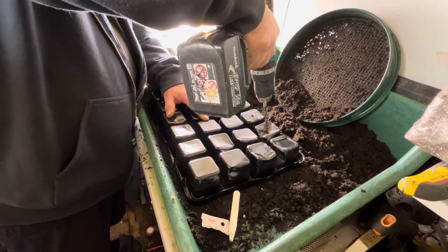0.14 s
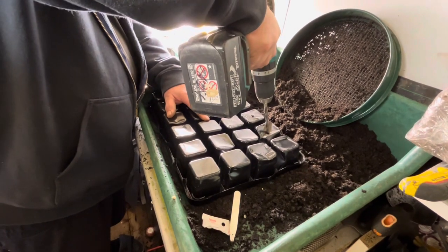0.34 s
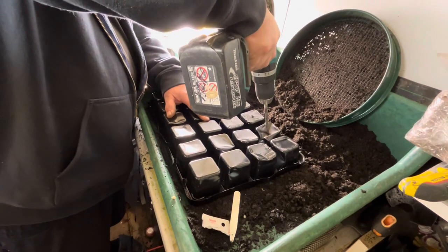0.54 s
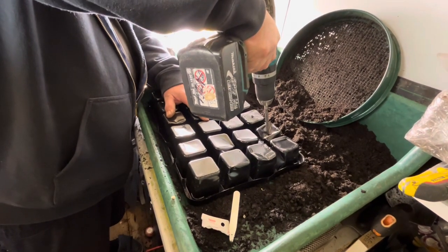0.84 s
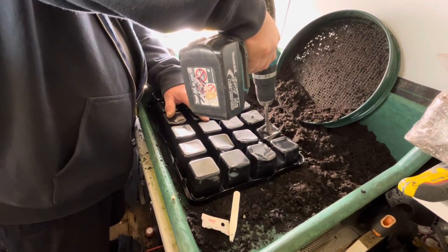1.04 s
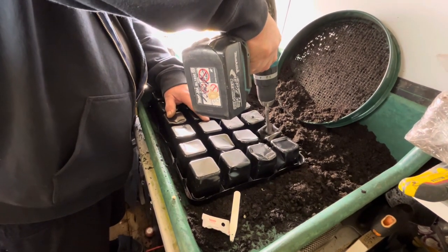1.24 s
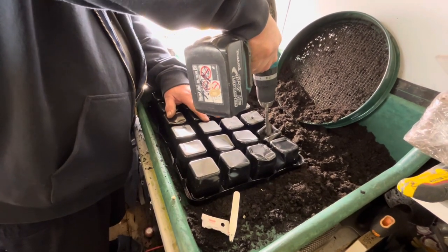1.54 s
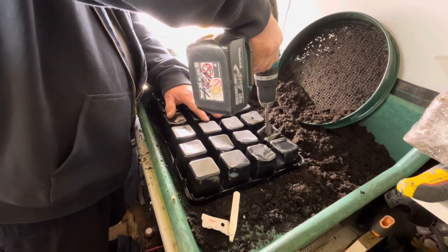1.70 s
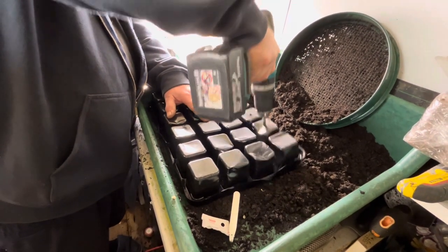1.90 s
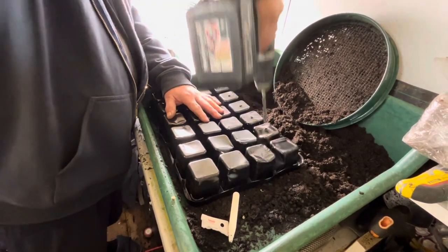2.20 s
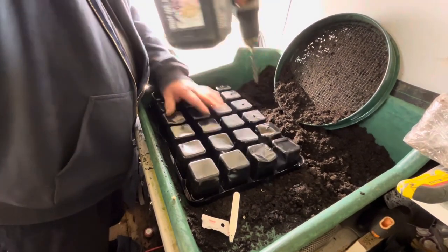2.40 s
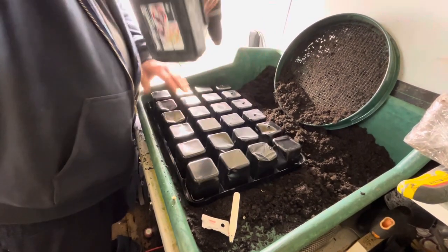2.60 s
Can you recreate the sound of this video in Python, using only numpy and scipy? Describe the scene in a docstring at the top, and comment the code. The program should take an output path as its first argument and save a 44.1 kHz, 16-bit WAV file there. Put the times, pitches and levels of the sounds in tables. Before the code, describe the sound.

Cordless drill boring steadily into a plastic seed tray, ending in loud rattling snaps.

```python
"""In a small shed, close by on a potting bench, a cordless drill bores through a thin plastic seed tray.
The motor spins up under a steady whine; its shaft sounds a harmonic series and rattles the gears.
The bit catches, snaps and chatters by stick-slip friction, and each blow rings the tray's damped modes.
The drill brakes with a squeal, the tray drops off the bit, and a hand shifts it."""
import sys
import numpy as np
from scipy import signal
from scipy.fft import rfft, irfft
from scipy.io import wavfile
from scipy.ndimage import uniform_filter1d

SR = 44100
rng = np.random.default_rng(int(sys.argv[2]) if len(sys.argv) > 2 else 0)


def output_pcm(signal):
    """Save a mono or channel-first signal as 16-bit PCM at the path in sys.argv[1].

    Samples are clipped to [-1, 1] before scaling.
    """
    pcm = np.clip(np.atleast_2d(signal).T, -1, 1) * 32767
    wavfile.write(sys.argv[1], SR, np.round(pcm).astype(np.int16))


N = 121275
T = np.arange(N) / SR
RISE_S = 0.00075  # attack of every blow on the tray

# spectrum of cracking or scraped plastic: f/Hz, relative level/dB
CRACK_SPECTRUM = [(60, -28), (700, 7), (1400, 5.5), (4500, -5.5), (7000, -19), (16000, -47)]


def amp(db):
    """Amplitude ratio of a level in decibels."""
    return 10 ** (np.asarray(db) / 20)


def unit(x):
    """Normalisation to an rms of 1."""
    return x / np.sqrt(np.mean(x ** 2) + 1e-20)


def curve(table, column=1):
    """Linear interpolation of a time table at every sample."""
    rows = np.array(table)
    return np.interp(T, rows[:, 0], rows[:, column])


def at_frequency(table, hz):
    """Interpolation on a logarithmic frequency axis."""
    f, value = np.transpose(table)
    return np.interp(np.log(hz + 1), np.log(f + 1), value)


def add(mix, start, sound):
    """Superposition of a sound on the mix, from start in seconds."""
    part = mix[..., max(round(start * SR), 0):][..., :sound.shape[-1]]
    part += sound[..., :part.shape[-1]]


def drift(hz):
    """Random fluctuation: low-passed noise of rms 1."""
    rolloff = 1 + (np.fft.rfftfreq(N, 1 / SR) / hz) ** 4
    return unit(irfft(rfft(rng.standard_normal(N)) / rolloff, N))


def noise(spectrum, grain=1):
    """Source and filter: partly coherent stereo noise, modulated by grain, with narrow resonances."""
    # likeness of left and right: f/Hz, correlation
    correlation = [(60, 1), (600, 0.46), (5000, -0.11), (13500, 0.3)]
    hz = np.fft.rfftfreq(N, 1 / SR)
    ripple = unit(uniform_filter1d(rng.standard_normal((2, len(hz))), size=130))
    gain = amp(at_frequency(spectrum, hz) + 2.8 * ripple * hz / (hz + 1000))
    mid, side = rfft(rng.standard_normal((2, N)) * grain) * gain
    alike = at_frequency(correlation, hz)
    mid, side = mid * np.sqrt(1 + alike), side * np.sqrt(1 - alike)
    return unit(irfft(np.array([mid + side, mid - side]), N))


def tone(cycles, pan_db, lead_rad):
    """A sine placed by interaural level and phase: the left is pan_db louder and lead_rad ahead."""
    side = np.array([[.5], [-.5]])
    return amp(side * pan_db) * np.sin(2 * np.pi * cycles + side * lead_rad)


def strike(t, rise, t60):
    """Envelope of a damped vibration: linear rise, exponential decay."""
    return np.clip(t / rise, 0, 1) * np.exp(-np.log(1000) * np.maximum(t - rise, 0) / t60)


def rumble():
    """Ambient noise: faint, steady and strongest in the bass."""
    # background spectrum: f/Hz, relative level/dB
    spectrum = [(20, -4.5), (65, 2.5), (350, -10), (5000, -41)]
    return amp(-59) * noise(spectrum)


def shed_reverb(sound):
    """Reverberation: convolution with a short diffuse tail whose treble dies first."""
    # reverberation time of the shed: f/Hz, t60/s
    decay = [(100, 0.12), (14000, 0.054)]
    reflections = rng.standard_normal((2, SR // 2)) * (T[:SR // 2] > .004)
    hz, t, bands = signal.stft(reflections, SR, nperseg=256)
    absorption = np.exp(-np.log(1000) * t / at_frequency(decay, hz)[:, None])
    tail = signal.istft(bands * absorption, SR, nperseg=256)[1]
    return amp(-13) * signal.fftconvolve(sound, tail / np.linalg.norm(tail[0]), axes=1)[:, :N]


def bit_groan():
    """Friction tone: a soft falling note as the slowly turning bit rubs the plastic."""
    # course of the groan: t/s, f/Hz, level/dB
    glide = [(.15, 384, -53), (.33, 285.6, -51), (.47, 278.5, -51.5), (.58, 271, -66)]
    pressed = (T > glide[0][0]) & (T < glide[-1][0])
    cycles = np.cumsum(curve(glide)) / SR
    return pressed * amp(curve(glide, column=2)) * np.sin(2 * np.pi * cycles)


def clear_rings():
    """Damped oscillation: single, slightly wavering tones that swell and die."""
    # soft knock, brake squeal, bit pulling free (two rows), bench: t/s, f/Hz, level/dB, rise/s, t60/s
    rings = [(0.041, 326, -33, 0.0021, 0.029), (2.152, 13460, -26, 0.0082, 0.078),
             (2.466, 435.5, -22, 0.0045, 0.11), (2.472, 874, -25, 0.012, 0.066),
             (2.68, 147.6, -35.5, 0.013, 0.067)]
    out, t = np.zeros((2, N)), T[:SR // 3]
    for start, hz, db, rise, t60 in rings:
        cycles = np.cumsum(hz * (1 + 0.0055 * drift(hz=150)[:len(t)])) / SR
        add(out, start, amp(db) * strike(t, rise, t60) * np.sin(2 * np.pi * cycles))
    return out


def tray_ring(start, pitch_spread):
    """Free vibration: the tray's normal modes after one blow, detuned as the plastic bends."""
    # modes of the tray: f/Hz, relative level/dB, t60/s, left minus right/dB
    modes = [(332.3, -10.5, 0.13, 3.5), (412.4, -6, 0.086, -1), (564, -2.5, 0.046, -2.5),
             (640, 3.5, 0.056, 4.5), (889, -5, 0.054, 10), (1037, -2.5, 0.056, -8.5),
             (1452, -14, 0.061, 11)]
    # sinking pitch of the bending tray: t/s, frequency ratio
    sink = [(1.95, 1.01), (2.06, .96)]
    detune = np.interp(start, *np.transpose(sink)) + pitch_spread * rng.standard_normal(len(modes))
    t = T[:SR // 6]
    ring = sum(amp(db) * strike(t, RISE_S, t60) * tone(hz * ratio * t, pan_db, lead_rad=-0.81)
               for (hz, db, t60, pan_db), ratio in zip(modes, detune))
    return signal.sosfilt(signal.butter(2, modes[0][0], "high", fs=SR, output="sos"), ring / 2)


def tray_snaps():
    """Impulsive excitation: plastic that gives way or is knocked cracks, ticks and rings."""
    # snaps and knocks: t/s, ring level/dB, crack level/dB, tick level/dB
    blows = [(.148, -41, -31.5, -30.5), (0.871, -24.5, -28.5, -53), (1.512, -21, -15, -24),
             (1.552, -23.5, -24, -50), (1.589, -24, -19.5, -25.5), (1.752, -26, -17.5, -46),
             (1.8065, -3, -19, -47), (1.91, -14, -9.5, -23.5), (1.941, -13, -18, -19.5),
             (1.986, -7.5, -22.5, -50), (2.038, -7.5, -20, -50), (2.091, -20, -43, -20),
             (2.15, -17.5, -21, -32), (2.388, -20, -41.5, -46), (2.4149, -18.5, -17, -27),
             (2.426, -17, -36, -62), (2.464, -18.5, -40, -70), (2.639, -33, -45, -49)]
    # spectrum of the bright tick: f/Hz, relative level/dB
    tick_spectrum = [(1000, -20.5), (4500, 7.5), (16000, -10.5)]
    splinters = np.sqrt(rng.exponential(1, N))
    ring, crack, tick = np.zeros((2, N)), np.zeros(N), np.zeros(N)
    for start, ring_db, crack_db, tick_db in blows:
        add(ring, start, amp(ring_db) * tray_ring(start, pitch_spread=0))
        add(crack, start, amp(crack_db) * strike(T[:SR // 4], RISE_S, t60=0.09))
        add(tick, start, amp(tick_db) * strike(T[:SR // 4], RISE_S, t60=0.064))
    return ring + crack * noise(CRACK_SPECTRUM, splinters) + tick * noise(tick_spectrum, splinters)


def edge_catch():
    """Periodic loading: the cutting edge catches at a steady beat until the tray starts to bend."""
    period_s, peak_s, end_s = .0381, .945, 1.79
    return np.cos(2 * np.pi * (T - peak_s) / period_s) * (T < end_s)


def bit_chatter():
    """Stick-slip friction: each uneven slip of the bit scrapes and rings the tray."""
    # loudness of the cut as the bit presses: t/s, level/dB
    cut = [(.11, -68), (.15, -46), (1.79, -36), (1.85, -19.5), (1.92, -19), (1.975, -29.5), (2, -17.5),
           (2.09, -17), (2.137, -32.5), (2.18, -18), (2.225, -52.5), (2.31, -56.5), (2.45, -34.5),
           (2.52, -51), (2.62, -70.5), (2.66, -44), (2.75, -69.5)]
    slips_per_s, spread_db, scrape_db, catch_db = 130, 3, -6.5, 4
    scrape_noise, ring, scrape = noise(CRACK_SPECTRUM), np.zeros((2, N)), np.zeros(N)
    for k, (late, size) in enumerate(rng.standard_normal((600, 2))):
        start = (k + 0.2868 * late) / slips_per_s
        if start < T[-1]:
            force = amp(spread_db * size)
            add(ring, start, force * tray_ring(start, pitch_spread=0.013))
            add(scrape, start, force * strike(T[:SR // 10], RISE_S, t60=0.044))
    chatter = unit(ring) + amp(scrape_db) * unit(scrape * scrape_noise)
    running_rms = np.sqrt(abs(uniform_filter1d((chatter ** 2).mean(0), size=2200)) + 1e-9)
    return amp(curve(cut) + catch_db * edge_catch()) * chatter / running_rms


def tray_flex():
    """Flexural vibration: the bending tray radiates low noise."""
    # course of the flexing: t/s, level/dB
    envelope = [(0, -86), (.15, -73.5), (1.78, -48.5), (2.04, -32.5), (2.135, -44), (2.185, -28),
                (2.29, -60), (2.42, -36.5), (2.6, -66), (2.68, -50)]
    # its spectrum: f/Hz, relative level/dB
    spectrum = [(25, -26.5), (65, -3), (130, 3), (320, -9), (2000, -40)]
    return amp(curve(envelope)) * noise(spectrum)


def whine():
    """Frequency modulation: a nearly steady tone wavers, and sags at each catch of the edge."""
    # course of the whine: t/s, f/Hz, level/dB
    course = [(.11, 799, -95), (.19, 797, -45), (.222, 813, -32), (.256, 786, -28.5), (.272, 787, -47),
              (.288, 794, -32), (.364, 812.5, -29.5), (.59, 808, -35.5), (.72, 809.5, -32),
              (2.1, 789.2, -39.5), (2.14, 803, -95)]
    # its partials: harmonic number, relative level/dB, left minus right/dB
    partials = [(1, 1.5, 7.5), (6, -19, 4)]
    waver, sag = 0.00242, .003  # fractions of the frequency
    cycles = np.cumsum(curve(course) * (1 + waver * drift(hz=21.4) - sag * edge_catch())) / SR
    level = np.sqrt(2) * amp(curve(course, column=2) + 1.08 * drift(hz=30))
    return level * sum(amp(db) * tone(k * cycles, pan_db, lead_rad=1.66 / k)
                       for k, db, pan_db in partials)


def gear_rattle(turns):
    """Impact noise: random tooth contacts, modulated once per turn and filtered by the case."""
    # spectrum of the gearbox: f/Hz, relative level/dB
    spectrum = [(40, -17.5), (230, -35), (450, -11), (620, -5), (1080, -0.5), (1650, -6.5), (2500, -1),
                (4100, -5.5), (4920, 5), (5900, -5), (6650, -0.5), (8000, -8), (14400, -10.5),
                (15100, -41.5)]
    impacts_per_s, turn_depth = 3000, 0.096
    impacts = rng.random(N) < impacts_per_s / SR
    teeth = impacts * amp(-4 * np.minimum(rng.exponential(1, N), 4))
    return noise(spectrum, (0.68 + teeth) * (1 + turn_depth * np.cos(2 * np.pi * turns)))


def shaft_tones(speed, turns):
    """Forced vibration: shaft harmonics swell as they glide through resonances of the housing."""
    # shaft tones: harmonic number, level/dB
    harmonics = [(1, -49), (5, -45), (15, -50.5), (18, -50), (20, -50), (24, -49.5)]
    # housing resonances: f/Hz, half-width/Hz, boost/dB
    resonances = [(548, 15, 24.5), (885, 45, 10), (2435, 280, 6)]
    cutoff_hz, backlash_turns = 193, .005  # the small housing radiates little below the cutoff
    out = np.zeros(N)
    for k, db in harmonics:
        hz = k * speed
        boost_db = sum(lift / (1 + ((hz - centre) / width) ** 2) for centre, width, lift in resonances)
        radiated = 1 / np.sqrt(1 + (cutoff_hz / hz) ** 10)
        cycles = k * (turns + backlash_turns * drift(hz=70))
        out += radiated * amp(db + boost_db + 2 * drift(hz=5.3)) * np.sin(2 * np.pi * cycles)
    return out


def drill():
    """Rotating machinery: one shaft drives the rattle and the harmonics, under the whine."""
    # rotation of the motor shaft: t/s, f/Hz
    rotation = [(.2, 116), (.26, 130), (.36, 136), (.545, 120), (.585, 177), (.67, 196), (.84, 205),
                (2.1, 190), (2.22, 107)]
    # loudness of the gear rattle: t/s, level/dB
    gears = [(.114, -98), (.121, -39.5), (.25, -33), (.51, -31), (.58, -27.5), (1.8, -27), (2.1, -30),
             (2.125, -40.5), (2.18, -40), (2.25, -79)]
    waver, flutter_db = 0.0029, 0.65
    speed, gear_db = curve(rotation), curve(gears)
    turns = np.cumsum(speed * (1 + waver * drift(hz=25.1))) / SR
    level = amp(gear_db + flutter_db * drift(hz=60))
    load = np.minimum(2 * level / amp(gear_db.max()), 1)
    return level * gear_rattle(turns) + load * shaft_tones(speed, turns) + whine()


def scene():
    """Superposition of direct sound, the shed's reverberation and ambient noise."""
    direct = drill() + bit_groan() + tray_snaps() + bit_chatter() + tray_flex() + clear_rings()
    return direct + shed_reverb(direct) + rumble()


def record(dry):
    """Clipping at full scale, then band limiting."""
    lowpass = signal.firwin(511, 16200, window=("kaiser", 9), fs=SR)
    return signal.oaconvolve(np.clip(dry, -1, 1), lowpass[None], "same")


dry = scene()
out = record(dry)
output_pcm(out)
```